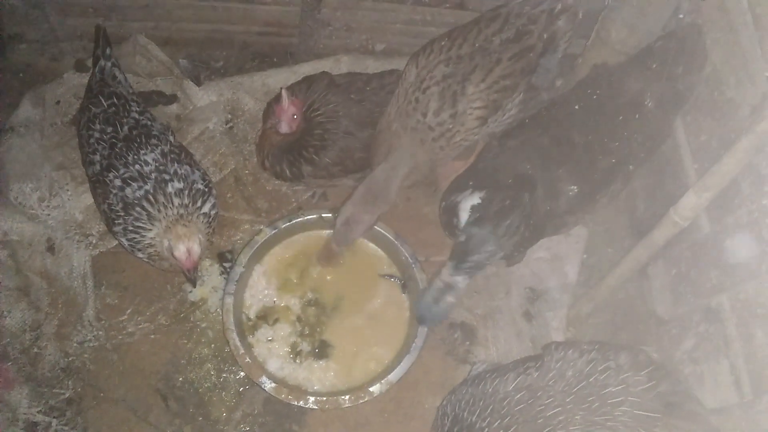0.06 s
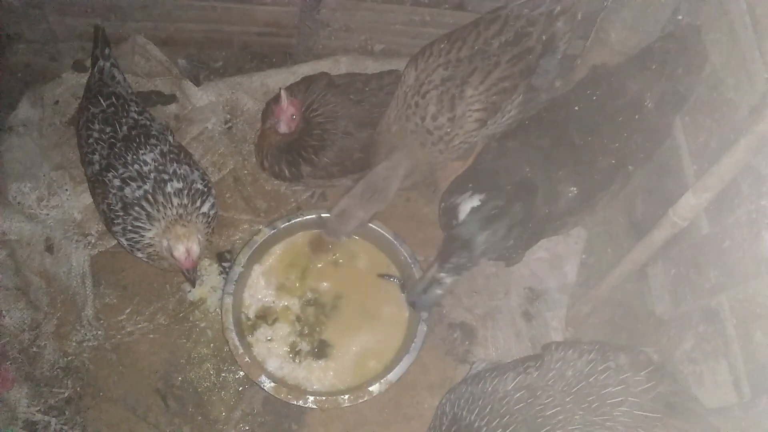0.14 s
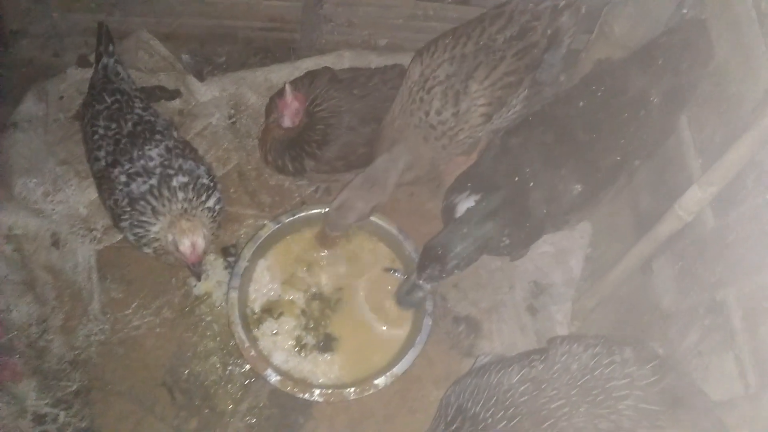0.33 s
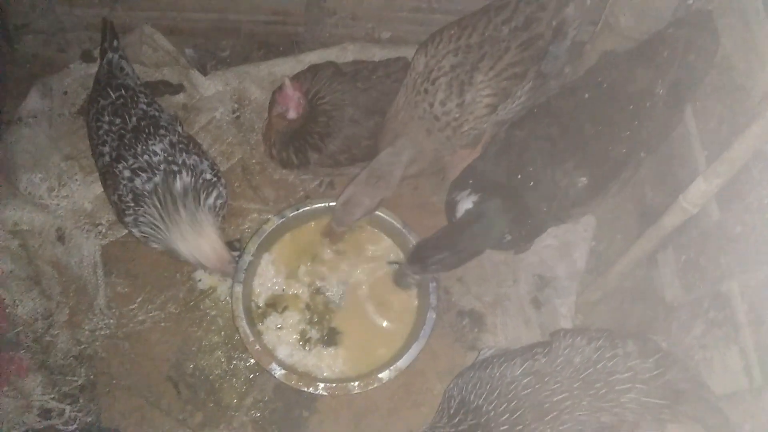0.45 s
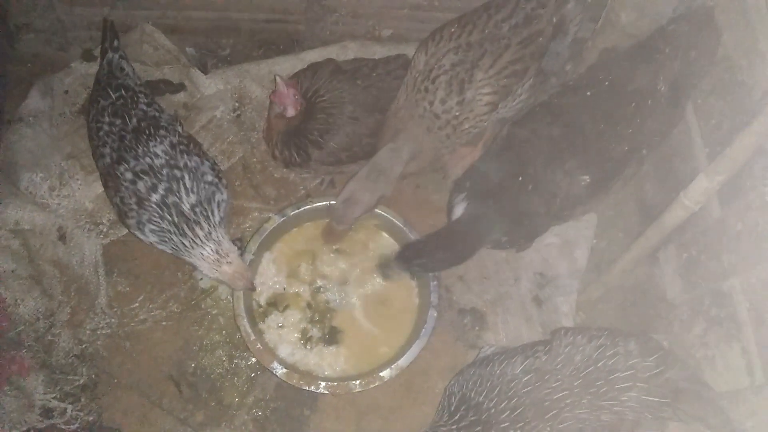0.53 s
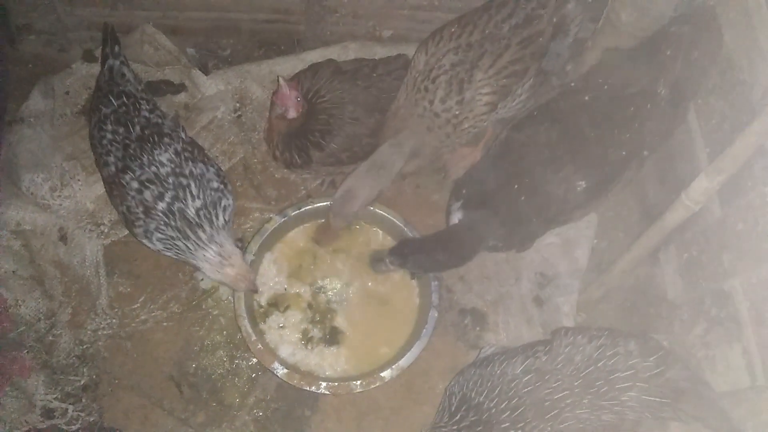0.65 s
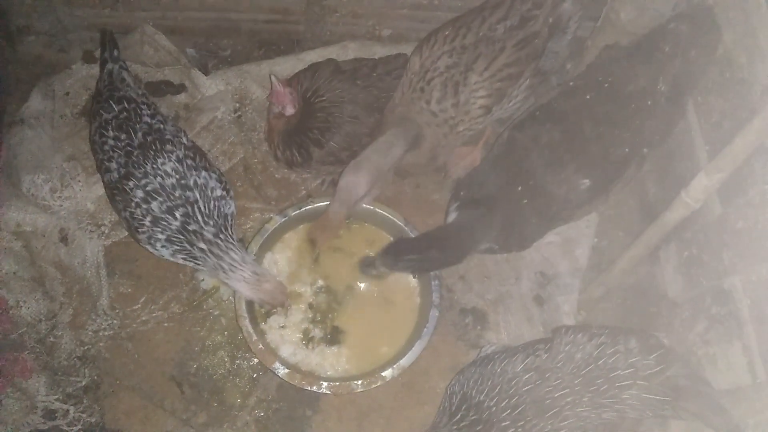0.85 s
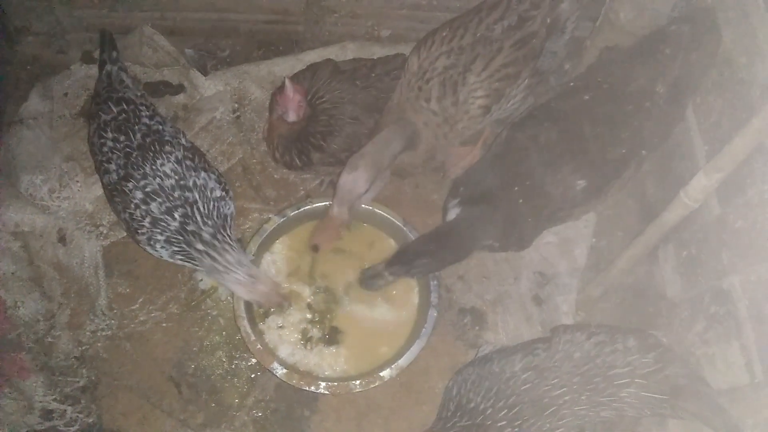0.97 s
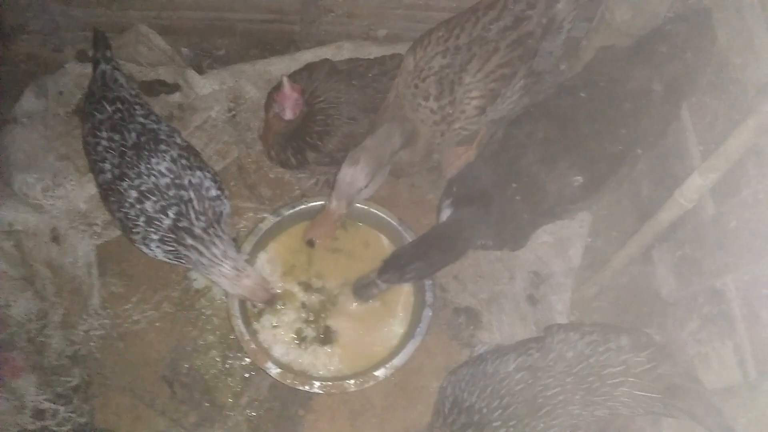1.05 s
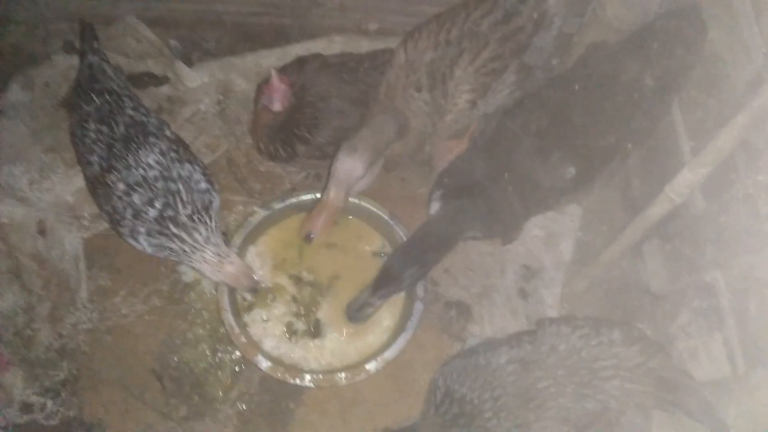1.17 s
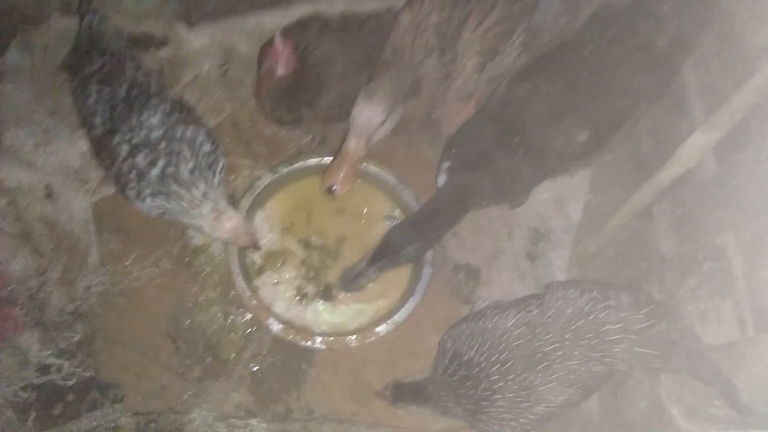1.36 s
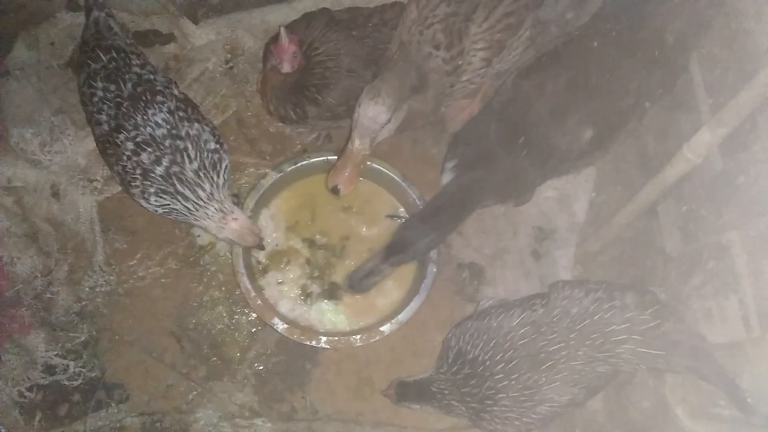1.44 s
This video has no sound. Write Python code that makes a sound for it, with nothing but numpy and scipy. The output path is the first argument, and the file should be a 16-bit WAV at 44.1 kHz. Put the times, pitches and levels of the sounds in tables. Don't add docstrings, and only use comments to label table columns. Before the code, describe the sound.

Ducks dabble their bills in a metal bowl of watery feed with quick wet plops and splashes

```python
import sys
import numpy as np
from scipy import signal
from scipy.fft import rfft, irfft
from scipy.io import wavfile
from scipy.ndimage import uniform_filter1d, map_coordinates

SR = 44100
rng = np.random.default_rng(int(sys.argv[2]) if len(sys.argv) > 2 else 0)


def boost_factor(decibels):
    exponent = np.asarray(decibels, float) / 20
    return 10 ** exponent


def store_pcm(level_fs):
    pcm = np.round(np.clip(level_fs, -1, 1) * 32767).astype(np.int16)
    wavfile.write(sys.argv[1], SR, np.atleast_2d(pcm).T)


N = 66150


def band(x, hz, width):
    centre = min(hz, 0.45 * SR)
    return signal.lfilter(*signal.iirpeak(centre, centre / width, SR), x)


def butter(x, order, hz, kind):
    return signal.sosfilt(signal.butter(order, hz, kind, fs=SR, output="sos"), x)


def unit(x):
    return x / np.sqrt(np.mean(x ** 2) + 1e-30)


def add(out, start_s, x):
    i = max(int(start_s * SR), 0)
    out[i:i + len(x)] += x[:N - i]


def walk(rate):
    knots = rng.standard_normal(1000)
    return 0.947 * map_coordinates(knots, [np.arange(N) / SR * rate], order=2)


def curve(table):
    times, levels = np.transpose(table)
    return np.interp(np.arange(N) / SR, times, levels)


def bubble_cloud(voices, length, rate, hz, spread, q):
    chance = rng.random((voices, length))
    kicks = (chance < rate / SR / voices) * np.cos(chance * 1e7)
    pitches = hz * (1 + spread * np.linspace(-1, 1, voices))
    total = np.zeros(length)
    for kick, pitch in zip(kicks, pitches):
        total += band(band(kick, pitch, pitch / q), pitch, 2 * pitch / q)
    return unit(total)


# start_s, level_db, pitch_hz, trail_db, trail_t60_s
POCKETS = [(0.101, -60.5, 1592, -33, 0.071), (0.163, -59.5, 1689, -27, 0.081),
           (0.207, -32.5, 1654, -19.5, 0.099), (0.236, -36, 1827, -7.5, 0.113),
           (0.261, -41.5, 1456, -9.5, 0.164), (0.268, -40, 2542, -14, 0.137),
           (0.308, -24, 2454, -14.5, 0.137), (0.327, -20.5, 2197, -20, 0.164),
           (0.404, -32, 1920, -7.5, 0.069), (0.433, -19, 2399, -18.5, 0.113), (0.468, -45, 1650, -35, 0.09),
           (0.498, -40.5, 2857, -16, 0.196), (0.513, -44, 1915, -18.5, 0.1), (0.538, -34, 1530, -18, 0.074),
           (0.545, -28.5, 1953, -21, 0.086), (0.609, -37, 1680, -18, 0.074),
           (0.667, -50, 2490, -3.5, 0.166), (0.704, -34.5, 2252, -11.5, 0.0806),
           (0.737, -34.5, 1145, -24, 0.058), (0.864, -38.5, 2357, -24, 0.164),
           (0.938, -30.5, 2247, -16.5, 0.0614), (1.041, -29, 2085, -27, 0.08),
           (1.124, -53.5, 2124, -11, 0.26), (1.146, -39.5, 1620, -8, 0.0655),
                (1.167, -45.5, 2174, -21, 0.043), (1.213, -47, 3309, -12.5, 0.201),
                (1.222, -42, 1970, -21.5, 0.04), (1.262, -51, 1275, -10, 0.078),
                (1.328, -57, 864.6, -3, 0.0804), (1.363, -50, 1143, -2.5, 0.098),
                (1.379, -37, 2680, -18, 0.296), (1.395, -51.5, 2370, -24, 0.051),
                (1.414, -47, 992.6, -1, 0.0535), (1.427, -45, 1057, -8, 0.068),
                (1.463, -49.5, 1062, -12.5, 0.158), (1.472, -50, 3314, -6, 0.216)]


def plops():
    rise_s, fall_s, glide = 0.000822, 0.0048, 0.06
    out, t = np.zeros(N), np.arange(6000) / SR
    onset = 1 - np.exp(-t / rise_s)
    for start_s, level_db, hz, trail_db, t60_s in POCKETS:
        swell = (t / rise_s) ** 2 * np.exp(-t / rise_s) / 0.733
        tail = 0.693 * np.exp(-t * (hz / 2200) / fall_s) * onset ** 2
        bend = 1 + glide * np.tanh((t - 0.003) / 0.011)
        pocket = (swell + tail) * np.sin(2 * np.pi * hz * t * bend)
        lone = all(abs(row[0] - start_s - 0.002) > 0.004 for row in BUBBLES)

        splat = unit(butter(rng.standard_normal(len(t)), 4, [hz / 2, hz * 1.573], "band"))
        splat = splat * np.exp(-t / 0.00511) * onset
        splat_db = -9.5 + trail_db / 2

        trail = bubble_cloud(3, len(t), 450, hz, 0.1205, 9.4)
        trail = trail * 1000 ** (-t / t60_s) * (1 - np.exp(-t / 0.00163))
        plop = 0.645 * lone * pocket + boost_factor(splat_db) * splat + boost_factor(trail_db) * trail
        add(out, start_s - 0.001, boost_factor(level_db) * plop)
    return out


# start_s, level_db, pitch_hz, width_s
BUBBLES = [(.2073, -38, 1880, 0.00059), (.2095, -37.5, 2248, 0.00077), (.2095, -32, 1569, 0.00171),
           (.2245, -45, 1563, 0.00146), (.2387, -37, 1839, 0.00178), (.2623, -38.5, 1479, 0.00116),
           (.2685, -44, 2592, 0.00161), (.281, -45.5, 2542, 0.00253), (.307, -38.5, 1573, 0.00165),
           (.3095, -30.5, 2596, 0.00075), (.3146, -36.5, 2974, 0.00065), (.3269, -30, 1757, 0.00091),
           (.3298, -30, 2082, 0.00128), (.3303, -28, 2352, 0.00313), (.3356, -39, 2104, 0.00113),
           (.3474, -41, 2252, 0.0031), (.4063, -41, 1679, 0.0028), (.4109, -41.5, 2000, 0.00379),
           (.4336, -33, 1684, 0.000804), (.4345, -32, 2800, 0.00105), (.4354, -25, 2403, 0.00155),
           (.4363, -31, 2117, 0.0011), (.4397, -37.5, 2362, .0012), (.4517, -36.5, 2322, 0.00276),
           (.4693, -34.5, 1672, 0.00068), (.5321, -45, 1618, 0.00156), (.5399, -41, 1540, 0.00045),
           (.5457, -40.5, 1682, 0.00087), (.6104, -39, 1657, 0.00118), (.7055, -34, 2233, 0.000817),
           (.8657, -39, 2304, 0.00069), (.9391, -32.5, 2200, 0.00094), (.9446, -48.5, 1960, 0.0026),
           (1.0424, -32, 2159, 0.00127), (1.0462, -43.5, 2185, 0.00097), (1.056, -48, 2149, 0.00175),
           (1.0755, -52.5, 2199, 0.00292), (1.1476, -47, 1682, 0.00124), (1.1543, -50.5, 1761, 0.00088),
           (1.2241, -40, 2040, 0.000665), (1.2245, -53, 1052, 0.0021), (1.2575, -57, 848.3, .006),
           (1.376, -46.5, 1081, 0.00098), (1.38, -41, 2640, 0.0013), (1.3941, -45.5, 2484, 0.00097)]
# start_s, level_db, pitch_hz
GURGLE = [(.751, -51, 1160), (.778, -55.5, 1175), (.797, -55.5, 1200), (.812, -55, 1150), (.825, -55, 1150),
          (.849, -53.5, 1200), (.868, -59, 1200), (.885, -58.5, 1225), (.906, -55, 1225), (.93, -58, 1240),
          (.956, -61, 1250)]


def single_bubbles():
    glide, gurgle_width_s = 0.0186, 0.00428
    out = np.zeros(N)
    for middle_s, level_db, hz, width in BUBBLES + [(*pulse, gurgle_width_s) for pulse in GURGLE]:
        t = np.arange(-3 * width, 3 * width, 1 / SR)
        swell = np.exp(-(t / width) ** 2 / 2)
        bend = 1 + glide * t / width * (width < 0.004) / 2
        tone = np.sin(2 * np.pi * hz * t * bend + hz)
        add(out, middle_s + t[0], boost_factor(level_db) * swell * tone)
    return out


# start_s, level_db
SLAPS = [
    (0.305, -40.5),
    (0.404, -42),
    (0.467, -36.5),
    (0.607, -49),
    (1.221, -41),
]


def slaps():
    out, t = np.zeros(N), np.arange(3000) / SR
    env = np.exp(-t / 0.01104) * (1 - np.exp(-t / 0.0017))
    for start_s, level_db in SLAPS:
        burst = bubble_cloud(4, len(t), 2200, 1542.5, 0.319, 2.845)
        add(out, start_s - 0.001, boost_factor(level_db - 2.5) * burst * env)
    return out


# start_s, level_db, droplet_pitch_hz, hiss_db (against the droplets), t60_s
SPRAYS = [(0.2452, -59.5, 9080, -17.5, 0.074), (0.2559, -52.5, 4182, -7, 0.377),
          (0.3089, -45.5, 4260, 4, 0.073), (0.3274, -35, 8065, -1, 0.0437), (0.341, -40, 5367, 9.5, 0.0337),
          (0.4323, -47.5, 3955, -5.5, 0.069), (0.4663, -47, 3805, 5, 0.055), (0.4999, -44, 3924, -10, 0.13),
          (0.517, -42.5, 9610, -10, 0.06), (0.54, -42, 5625, 6, 0.0255), (0.6104, -37.5, 8910, 1.5, 0.0516),
          (0.6603, -42, 5240, 2.5, 0.0362), (0.6764, -41.5, 10790, -0.5, 0.0596),
          (0.7349, -62, 7000, 9.5, 0.0524), (0.8877, -57.5, 11110, 1.5, 0.0414),
          (0.943, -49.5, 4103, 5.5, 0.1045), (1.01, -57, 8070, -10.5, 0.0565),
          (1.041, -40.5, 7742, -11, 0.072), (1.1301, -55, 9450, -1.5, 0.188),
          (1.2335, -60.5, 5670, 5.5, 0.146), (1.3123, -47.5, 10080, -2.5, 0.0474),
          (1.395, -47, 6372, -2, 0.176), (1.433, -36.5, 10550, -2.5, 0.0352),
          (1.4716, -45, 6410, -1.5, 0.131)]
# start_s, level_db, droplet_pitch_hz
DROPS = [(0.861, -58, 4450), (1.291, -55.5, 10070), (1.3311, -51.5, 6080), (1.3756, -45, 4025),
         (1.4914, -54.5, 11200), (1.124, -55, 5590), (1.365, -53, 5790), (1.428, -47, 11150)]


def sprays():
    rise_s, slow_t60_s, crackle_db = 0.001547, 0.246, 3.5
    out, t = np.zeros(N), np.arange(6000) / SR
    for start_s, level_db, hz, hiss_db, t60_s in SPRAYS + [(*drop, -7, 0.04) for drop in DROPS]:
        centre_hz = 10483 if start_s > 1 else 2500 + 0.4496 * hz
        specks = bubble_cloud(7, len(t), 1200, centre_hz, 0.4975, 22)
        smooth_hiss = unit(band(rng.standard_normal(len(t)), centre_hz, 8160))
        flutter = unit(uniform_filter1d(rng.standard_normal(len(t)), size=60))
        hiss = unit(smooth_hiss + 0.68 * specks) * boost_factor(crackle_db * flutter)

        droplets = bubble_cloud(3, len(t), 1500, hz, 0.0446, 14.55)
        fade = 1000 ** (-t / t60_s) + 0.14 * 1000 ** (-t / slow_t60_s)
        env = (1 - np.exp(-t / rise_s)) * fade
        add(out, start_s - 0.002, boost_factor(level_db - 9) * env * (boost_factor(hiss_db) * hiss + droplets))
    return out


# time_s, level_db
STIR = [(0, -63), (.04, -87.5), (.18, -100), (.25, -65.5), (.33, -65), (.40, -62), (.5, -54), (.6, -61),
        (.7, -62.5), (.8, -69), (1.1, -74.5), (1.205, -66), (1.24, -59), (1.3, -74), (1.4, -62), (1.5, -76)]


def stir():
    bubbling = bubble_cloud(5, N, 500, 1712.5, 0.4406, 5.53)
    fizz = bubble_cloud(5, N, 3000, 8000, 0.46, 1.3)
    water = butter(bubbling + boost_factor(-14) * fizz, 2, 800, "high")
    return boost_factor(curve(STIR) + 2 * walk(25.116)) * water


# start_s, level_db
PECKS = [
    (0.566, -58),
    (0.883, -54),
    (0.985, -55.5),
    (1.112, -53.5),
]


def pecks():
    gap_s, nudge_hz, tick_hz = 0.007066, 377, 745
    out, t = np.zeros(N), np.arange(900) / SR
    nudge = np.sin(2 * np.pi * nudge_hz * t) * np.exp(-t / 0.00137)
    tick = np.sin(2 * np.pi * tick_hz * t) * np.exp(-t / 0.000262)
    for start_s, level_db in PECKS:
        add(out, start_s, boost_factor(level_db + 6) * nudge)
        add(out, start_s + gap_s, boost_factor(level_db + 19) * tick)
    return butter(out, 2, [280, 1800], "band")


# start_s, level_db, length_s, pitch_hz
THUMPS = [
    (0.125, -62.5, 0.1554, 105.5),
    (0.269, -73.5, 0.106, 76.1),
    (0.512, -54.5, 0.207, 93.75),
    (0.67, -63.5, 0.0964, 74.2),
    (0.886, -71, 0.105, 69.8),
    (1.194, -72, 0.11, 69),
    (1.309, -63.5, 0.13, 93.8),
    (1.406, -68.5, 0.143, 73.8),
    (1.236, -62, 0.055, 293.3),
]


def thumps():
    out = np.zeros(N)
    for start_s, level_db, length_s, hz in THUMPS:
        u = np.linspace(0, 1, int(length_s * SR))
        sag = 0.43 * min(100 / hz, 1)
        swell = np.sin(np.pi * u ** 0.514) ** 2
        tone = np.sin(2 * np.pi * hz * length_s * (u - sag * u ** 2 / 2))
        add(out, start_s, boost_factor(level_db) * swell * tone)
    rumble = unit(band(band(rng.standard_normal(N), 75, 70), 75, 110))
    rustle = boost_factor(-23.5) * unit(band(rng.standard_normal(N), 290, 260))
    shake = uniform_filter1d(np.abs(out), size=3000)
    return out * boost_factor(2.12 * walk(45.24)) + shake * (0.422 * rumble + rustle)


# pitch_hz, level_db (per Hz)
AIR = [(15, -39), (25, -3), (305, -13.5), (534, -9), (818, -10), (1320, -17.5), (1590, -5.5), (2500, -23.5),
       (14500, -33)]
# time_s, level_db
SHUFFLE = [(0, 1), (.1, -4.5), (.3, -7.5), (.42, 4.5), (.65, 0), (.77, 5), (.95, -3), (1.2, 5), (1.5, -1.5)]


def pen():
    hz = np.fft.rfftfreq(N, 1 / SR)
    air_hz, air_db = np.transpose(AIR)
    shape = boost_factor(np.interp(np.log(hz + 1), np.log(air_hz), air_db)) * (hz > 32)
    spectrum = rfft(rng.standard_normal(N)) * shape
    shuffle = irfft(spectrum * (hz < 900), N) * (boost_factor(curve(SHUFFLE)) - 1)
    air = irfft(spectrum, N) + shuffle
    loudness = np.std(irfft(spectrum * (hz > 150), N))
    return air / loudness * boost_factor(-76 + 0.98 * walk(9.71))


def pen_ring(wet):
    t60_s, level_db, centre_hz = 0.141, -18, 2240
    t = np.arange(13230) / SR
    flutter = boost_factor(3 * unit(uniform_filter1d(rng.standard_normal(len(t)), size=200)))
    ring = band(rng.standard_normal(len(t)), centre_hz, 4100) * 1000 ** (-t / t60_s)
    ring = ring * (t > 0.003) * flutter
    return boost_factor(level_db) * signal.fftconvolve(wet, ring / np.linalg.norm(ring))[:N]


def scene():
    wet = plops() + single_bubbles() + slaps() + sprays() + stir()
    mid = wet + pen_ring(wet) + pecks() + thumps() + pen()
    side = band(mid * walk(550), 14000, 12000)
    side = boost_factor(-4) * butter(side, 4, 7000, "high")
    return np.array([mid + side, mid - side])


def low_pass(x):
    return signal.sosfilt(signal.butter(12, 15140, fs=SR, output="sos"), x)


def record(dry):
    top_cut = signal.ellip(10, 0.2, 70, 14350, fs=SR, output="sos")
    mix = signal.sosfilt(top_cut, dry)
    return low_pass(mix)


dry = scene()
out = record(dry)
store_pcm(out)
```